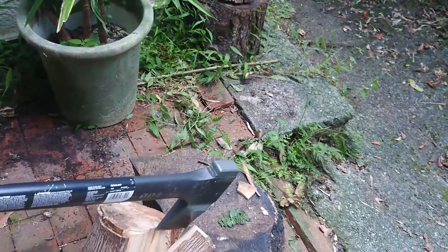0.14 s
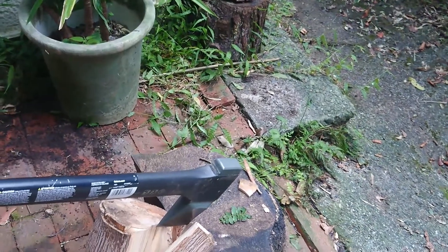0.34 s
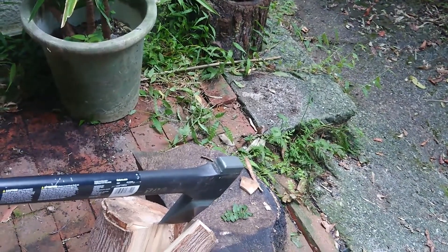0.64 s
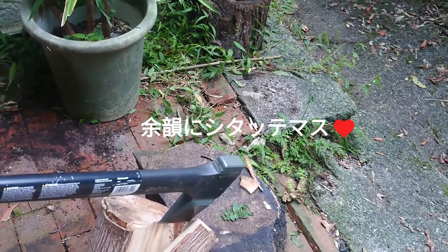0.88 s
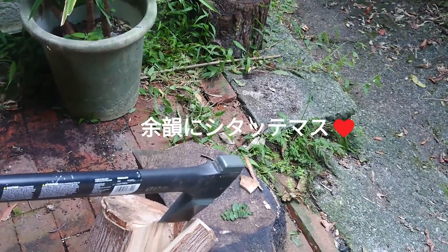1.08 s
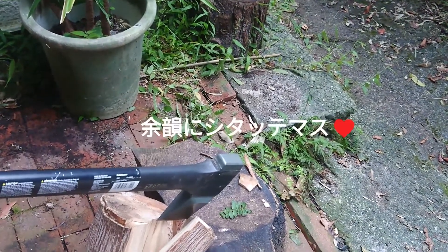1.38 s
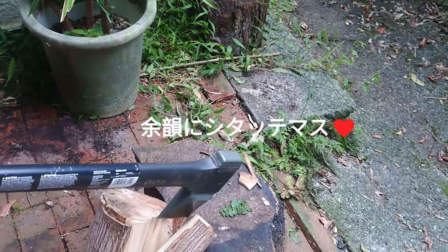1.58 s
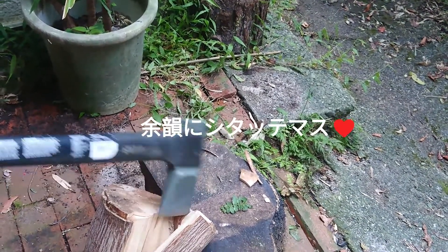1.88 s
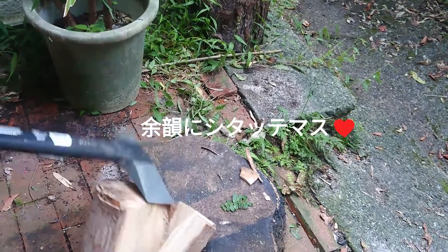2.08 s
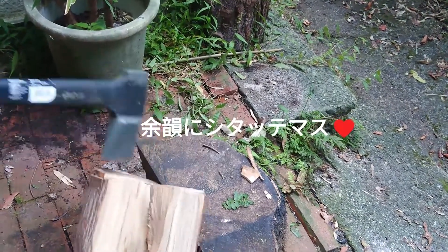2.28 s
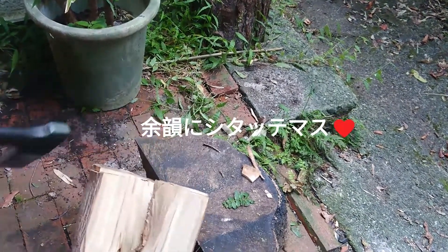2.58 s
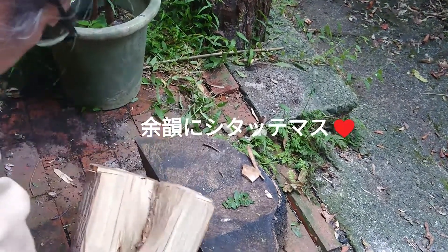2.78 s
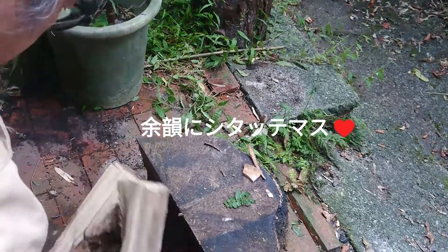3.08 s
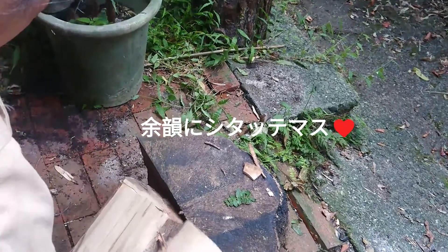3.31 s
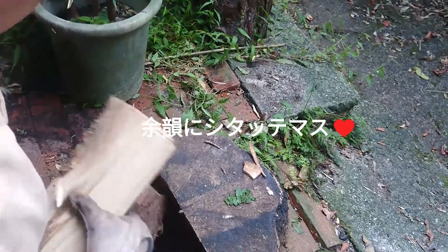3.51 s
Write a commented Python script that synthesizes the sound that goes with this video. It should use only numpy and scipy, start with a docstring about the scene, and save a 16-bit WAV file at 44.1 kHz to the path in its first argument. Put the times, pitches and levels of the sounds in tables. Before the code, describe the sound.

Wood knocks, creaks and splinters close by, ending with a loud clunk in a quiet yard.

```python
"""In a quiet yard an axe head is levered out of a split log; the wood scrapes, ticks, cracks and thuds.
Rubbed and snapping wood is coloured fibre clicks; cracks, knocks and thuds are half-sine pushes on modes.
Shaped noise makes distant traffic rumble under leaves and air. Gliding sine strokes make a high cricket,
throbbing narrow noise a low one, and short noise the swells of a far cicada and one small chirp.
A phone with two microphone ports listens from close by."""
import sys
import numpy as np
from scipy import signal
from scipy.fft import rfft, irfft, next_fast_len
from scipy.io import wavfile
from scipy.ndimage import uniform_filter1d

SR = 44100
rng = np.random.default_rng(int(sys.argv[2]) if len(sys.argv) > 2 else 0)


def invert_db(x):
    """Field ratio 10**(x/20) for x, a level in decibels (scalar or array-like)."""
    u = np.asarray(x, float) / 20
    return 10 ** u


def wrap_up_sound(samples):
    """Save the sound to the file named by the first command line argument, as 16-bit audio."""
    columns = np.atleast_2d(samples).T
    # keep every value between -1 and 1, then stretch to whole-number steps
    tamed = np.clip(columns, -1, 1)
    steps = np.round(tamed * 32767).astype(np.int16)
    wavfile.write(sys.argv[1], SR, steps)


N = 160965


def evened(x):
    """Scales to unit rms."""
    return x / np.sqrt(np.mean(x ** 2) + 1e-20)


def read(points, hz):
    """Reads a table on a log-frequency axis."""
    f, value = np.transpose(points)
    return np.interp(np.log(hz + 1), np.log(f + 1), value)


def add(mix, s, sound):
    """Mixes a sound in at time s."""
    part = mix[round(s * SR):][:len(sound)]
    part += sound[:len(part)]


def colour(x, gain):
    """Filters by a gain given as a function of Hz."""
    size = next_fast_len(len(x) + 4096)
    return irfft(rfft(x, size) * gain(np.fft.rfftfreq(size, 1 / SR)), size)[..., :len(x)]


def fuzzy(hz, width_hz, size):
    """Noise in one resonance, unrelated at the two ports."""
    bell = lambda f: 1 / (1 + (2 * (f - hz) / width_hz) ** 2)
    return np.array([evened(colour(rng.standard_normal(size), bell)) for _ in range(2)])


# tone of the neighbourhood: f/Hz, relative level/dB per Hz
AIR_TONE = [(15, -71), (25, 4.5), (65, -3.5), (118, 1.5), (238, -15.5), (410, -13), (496, -16), (726, -15),
            (1390, -21.5), (2270, -23.5), (4020, -35.5), (4860, -30.5), (5720, -44.5), (6380, -40.5),
            (7300, -50), (9330, -44.5), (12600, -57), (13600, -80)]
# likeness of the air at the two ports: f/Hz, likeness (1 = same, -1 = opposed)
AIR_LIKENESS = [(60, 0.8), (130, 0.98), (290, 0.71), (640, 0.5), (1410, -0.37), (3100, 0.071),
                (6820, -0.11), (15000, 0.15)]
# lean of the air to one side: f/Hz, left-right level/dB
AIR_LEAN = [(60, -1.5), (110, -2.5), (200, -0.5), (380, 2.5), (700, 0.0), (1290, -1.5), (2380, -7),
            (4400, -8), (8120, 7.5), (15000, -3)]
AIR_RMS_DB, AIR_PATCH_DB, AIR_SWELL_DB = -45.5, 1.2, 0.4


def air():
    """Rumble and hiss as noise in time and frequency, with drifting patches and a slow swell."""
    frames, hz = N // 256 + 5, np.fft.rfftfreq(1024, 1 / SR)
    a, b, c, d, patches = rng.standard_normal((frames, 513, 5)).T
    patches = evened(uniform_filter1d(uniform_filter1d(patches, 8, 0), 12, 1))
    swell = evened(uniform_filter1d(rng.standard_normal(frames), 60))
    same = np.clip(read(AIR_LIKENESS, hz), -1, 1)[:, None]
    left = a + 1j * b
    right = same * left + np.sqrt(1 - same ** 2) * (c + 1j * d)
    lean = read(AIR_LEAN, hz)[:, None] / 2
    level = read(AIR_TONE, hz)[:, None] + AIR_PATCH_DB * patches + AIR_SWELL_DB * swell
    spectrum = np.array([left, right]) * invert_db(level + np.array([lean, -lean]))
    return invert_db(AIR_RMS_DB) * evened(signal.istft(spectrum, nperseg=1024, noverlap=768)[1][:, :N])


# far cicada swells and one small, narrow chirp:
# start t/s, length t/s, level/dB at full swell before side balance, centre f/Hz, width f/Hz
CICADA_AND_CHIRP = [(.12, .33, -57.5, 4100, 430), (1.055, .09, -61, 3470, 80),
                    (1.07, .31, -57.5, 4120, 430), (1.43, .2, -69, 4500, 400), (3.28, .28, -60, 4200, 500)]
SWELL_SKEW = 0.9  # below 1 the swell tops early


def cicada_and_chirp():
    """Far cicada swells and one small, narrow chirp: narrow noise in single arcs."""
    out = np.zeros((2, N))
    for s, length, db, hz, width_hz in CICADA_AND_CHIRP:
        u = np.arange(0, length, 1 / SR) / length
        arc = invert_db(db) * np.sin(np.pi * u ** 0.9)
        for channel, note in zip(out, fuzzy(hz, width_hz, N)):
            add(channel, s, arc * note[:len(u)])
    return out


THROB_HZ, THROB_WIDTH_HZ, THROBS_PER_S = 4960, 230, 16
THROB_DB, THROB_SHARP = -73.5, 0.85  # level before side balance; higher is more peaked


def low_cricket():
    """A fuzzy note of narrow noise that throbs steadily."""
    t = np.arange(N) / SR
    throb = evened(np.exp(THROB_SHARP * np.cos(2 * np.pi * THROBS_PER_S * (t - 0.03))))
    return invert_db(THROB_DB) * fuzzy(THROB_HZ, THROB_WIDTH_HZ, N) * throb


# fader of the high cricket: t/s, level/dB before side balance
TRILL_LEVEL = [(.44, -98), (.5, -89), (.9, -82.5), (1.3, -80), (2, -75.5), (2.8, -76.5), (3.1, -75),
               (3.3, -85)]
# strokes of one chirp: middle f/Hz, relative level/dB
CHIRP_STROKES = [(6780, -3), (6500, 0), (6280, -2)]
CHIRP_START_S, CHIRPS_PER_S = 1.2035, 27.85  # the start only sets where the steady cycle falls
STROKE_S, STROKE_SPACING_S, STROKE_FALL_HZ = 0.011, 0.009, 450
WALL_ECHO_S, WALL_ECHO_DB = 0.016, -10


def high_cricket():
    """Each chirp is three falling sine strokes, echoed by a wall; the ports hear it in opposition."""
    t = np.arange(N) / SR
    since = ((t - CHIRP_START_S) * CHIRPS_PER_S % 1) / CHIRPS_PER_S
    chirps = np.zeros(N)
    for k, (hz, db) in enumerate(CHIRP_STROKES):
        u = np.clip((since - k * STROKE_SPACING_S) / STROKE_S, 0, 1)
        falling_hz = hz - STROKE_FALL_HZ * (u - 0.5)
        chirps += invert_db(db) * np.sin(np.pi * u) ** 2 * np.sin(2 * np.pi * np.cumsum(falling_hz) / SR)
    chirps = chirps + invert_db(WALL_ECHO_DB) * np.roll(chirps, round(WALL_ECHO_S * SR))
    chirps = evened(chirps) * invert_db(np.interp(t, *np.transpose(TRILL_LEVEL)))
    return np.array([chirps, -chirps * 2])


def insects():
    """Both crickets, the cicada and the small chirp, with one side balance for all."""
    balance_db = -5.5  # left-right
    both = high_cricket() + low_cricket() + cicada_and_chirp()
    return both * invert_db(np.array([[1], [-1]]) * balance_db / 2)


# decay of the reflections: f/Hz, t60 t/s
YARD_DECAY = [(150, 0.23), (600, 0.13), (2500, 0.16), (9000, 0.31)]
YARD_DB, YARD_MONO_HZ = -6.5, 500  # reflections grow alike at both ports below this


def yard(x):
    """Sparse reflections off bricks, pots and wall, each band dying at its own speed."""
    taps = rng.choice([-1., 1.], (2, SR // 2)) * (rng.random((2, SR // 2)) < 2000 / SR)
    taps[:, :150] = 0  # nothing returns in the first 3.4 ms
    hz, t, z = signal.stft(taps, SR, nperseg=256)
    decay = invert_db(-60 * t / read(YARD_DECAY, hz)[:, None])
    tail = signal.istft(z * decay, SR, nperseg=256)[1]
    unlike = colour(tail[0] - tail[1], lambda f: f ** 2 / (f ** 2 + YARD_MONO_HZ ** 2)) / 2
    tail = tail.mean(0) + np.array([unlike, -unlike])
    return invert_db(YARD_DB) * signal.fftconvolve(x[None], tail / np.linalg.norm(tail[0]), axes=1)[:, :N]


# lean of the near wood: f/Hz, left-right level/dB
NEAR_LEAN = [(60, -12), (110, 0.5), (200, -4), (380, 4), (700, -1.5), (1290, 0.5), (2380, -12.5),
             (4400, -10), (8120, 11.5), (15000, -2.5)]
NEAR_LEAD_S = 0.00015  # the left port hears it first


def ports(x):
    """A near source reaches the two ports with different colour and a small delay."""
    def path(side):
        return lambda f: (invert_db(side * read(NEAR_LEAN, f) / 2)
                          * np.exp(1j * np.pi * side * f * NEAR_LEAD_S))
    return np.array([colour(x, path(side)) for side in (1, -1)])


# colour of rubbed wood: f/Hz, relative level/dB per Hz
WOOD_GRAIN = [(250, 10), (600, 8.5), (1300, 8), (2100, 3.5), (2900, 5.1), (4000, 8), (5500, 5.5),
              (7000, -2.5), (8500, 0.5), (10500, -1), (12500, -12.5), (14200, -28), (16000, -17)]
FIBRES_PER_S, FIBRE_SPREAD_DB = 5500, 3.5
RING_DB, RING_WIDTH_HZ = 12, 500
LIFT_HZ = 5730  # half of the treble lift, in dB, is reached here


def rub(shape, judder_db, lift_db, hz):
    """Uneven fibre clicks under a pressure shape ring the wood at its colour and one resonance."""
    size = len(shape) + 1000  # room to ring on
    luck, when, sign, shake = rng.random((size, 4)).T
    strength = invert_db(FIBRE_SPREAD_DB * np.minimum(-np.log(luck + 1e-9), 4))
    clicks = strength * np.sign(sign - 0.5) * (when < FIBRES_PER_S / SR)
    clicks *= invert_db(judder_db * evened(uniform_filter1d(shake - 0.5, 150)))
    tone = lambda f: invert_db(read(WOOD_GRAIN, f)) * (1 + invert_db(RING_DB) / (1 + 2j * (f - hz) / RING_WIDTH_HZ))
    lift = lambda f: invert_db(lift_db / (1 + (LIFT_HZ / (f + 1)) ** 4))
    scale = np.std(colour(clicks, tone))
    pressed = clicks * np.pad(shape, (0, size - len(shape)))
    return colour(pressed, lambda f: tone(f) * lift(f)) / scale


# rough faces slide: start t/s, length t/s, level/dB at full pressure before lift, treble lift/dB, ring f/Hz
FACE_SCRAPES = [(1.729, 0.17, -57.5, -6, 2960), (1.983, 0.057, -47, -2.7, 3070),
                (2.05, 0.062, -45, 1.3, 2030), (2.152, 0.074, -41, 0, 3360), (2.155, 0.042, -46, -9, 1500),
                (2.207, 0.039, -48.5, 3, 2530), (2.24, 0.068, -49.5, 6.5, 2720),
                (2.283, 0.043, -40.5, -2, 2900), (2.588, 0.1, -56, 0, 2300), (2.769, 0.13, -46, 4, 2630),
                (2.911, 0.092, -50, -7.5, 1400), (3.01, 0.044, -48, 3, 2500),
                (3.056, 0.066, -41.5, -1, 2940), (3.154, 0.068, -56, 3.5, 3980),
                (3.248, 0.11, -52, -13, 1920), (3.39, 0.11, -52.5, -6, 2770),
                (3.463, 0.024, -53.5, 9, 2920), (3.56, 0.33, -61, -5, 2380)]
SCRAPE_SKEW, SCRAPE_JUDDER_DB = 0.47, 3.5  # skew below 1 tops early


def scrapes():
    """Rough faces slide over each other; the pressure swells and fades."""
    out = np.zeros(N)
    for s, length, db, lift_db, hz in FACE_SCRAPES:
        u = np.arange(0, length, 1 / SR) / length
        pressure = invert_db(db) * np.sin(np.pi * u ** SCRAPE_SKEW)
        add(out, s, rub(pressure, SCRAPE_JUDDER_DB, lift_db, hz))
    return out


# splinters snap: t/s, level/dB before halving and lift, t60 t/s, treble lift/dB, ring f/Hz
SPLINTER_TICKS = [(1.9857, -40, 0.022, -7, 3240), (2.1645, -32, 0.03, -6, 2900),
                  (2.179, -29, 0.034, -3, 3000), (2.2135, -35, 0.025, 0.1, 2430),
                  (2.2518, -29.5, 0.036, 8, 2800), (2.2848, -31.5, 0.032, -6, 2280),
                  (2.3016, -27, 0.019, -19, 2600), (2.3224, -48, 0.027, 5, 3100),
                  (2.403, -32.5, 0.032, -4, 1600), (2.498, -50, 0.029, 8, 2480),
                  (2.7776, -39, 0.031, -22, 2400), (2.8005, -32.5, 0.031, 4, 2520),
                  (2.8135, -31, 0.033, 0.1, 1500), (2.82, -27.5, 0.058, -1, 3010),
                  (2.8325, -27, 0.042, 1, 2520), (2.8704, -40, 0.028, -5, 1730),
                  (2.9525, -35, 0.043, -7, 1560), (3.013, -29, 0.024, 7.5, 3000),
                  (3.0574, -29.5, 0.04, 1, 3900), (3.0644, -23.5, 0.034, 2, 3520),
                  (3.092, -29, 0.03, -15, 3730), (3.2118, -31.5, 0.063, -8, 1660),
                  (3.257, -24, 0.038, -2.3, 8220), (3.264, -17, 0.025, -10, 2740),
                  (3.421, -37, 0.022, -2, 5800), (3.4272, -30, 0.043, -7, 2800),
                  (3.4675, -32.5, .02, 2, 6050), (3.47, -32, 0.023, 5.5, 2963),
                  (3.5645, -43.5, 0.07, -4, 2620)]
TICK_RISE_S, TICK_JUDDER_DB = 0.00042, 3


def ticks():
    """Splinters snap: fibre clicks that start at once and die away."""
    out = np.zeros(N)
    t = np.arange(SR // 10) / SR
    for s, db, t60, lift_db, hz in SPLINTER_TICKS:
        snap = np.minimum(t / TICK_RISE_S, 1) * invert_db(db - 60 * t / t60) / 2
        add(out, s - TICK_RISE_S, rub(snap, TICK_JUDDER_DB, lift_db, hz))
    return out


def fibres():
    """Scraping and snapping fibres together, drawn afresh at each call."""
    return scrapes() + ticks()


def blow(modes, peak_db, contact_ms, share):
    """A half-sine push sets the modes ringing, neighbours in opposite phase."""
    t = np.arange(SR // 4) / SR
    ring = np.zeros(len(t))
    for k, (hz, db, t60) in enumerate(modes):
        ring += (-1) ** k * invert_db(db - 60 * t / t60) * np.sin(2 * np.pi * hz * share * t)
    u = np.arange(SR // 100) / SR / (contact_ms / 1000)
    push = np.sin(np.pi * np.minimum(u, 1))
    sound = signal.fftconvolve(ring, push)
    return invert_db(peak_db) * sound / abs(sound).max()


def blows(modes, hits):
    """Lays a row of pushes on one set of modes along the timeline."""
    out = np.zeros(N)
    for s, peak_db, contact_ms, share in hits:
        add(out, s, blow(modes, peak_db, contact_ms, share))
    return out


# splinters crack sharply: t/s, peak level/dB, push t/ms, pitch share
CRACK_HITS = [(2.166, -29, 0.24, 0.94), (2.183, -26, 0.17, 0.99), (2.2535, -32, 0.12, 1.05),
              (2.291, -28.5, 0.12, 1.06), (3.0143, -22, 0.098, .99), (3.057, -29, 0.13, 1.14),
              (3.063, -19, 0.11, 0.92), (3.2575, -30, 0.23, .72), (3.4285, -34, .12, 0.79),
              (3.4705, -32.5, 0.082, 0.96)]
# modes of a splinter: f/Hz before pitch share, relative level/dB, t60 t/s
SPLINTER_MODES = [(2340, -3, 0.017), (2900, 2.5, .02), (3540, 2, 0.015), (4470, -3, 0.016),
                  (5840, -3, 0.0091), (7900, -10, .012)]


def cracks():
    """Splinters crack sharply: very short pushes ring small, high modes."""
    return blows(SPLINTER_MODES, CRACK_HITS)


# hard edges knock on wood: t/s, peak level/dB, contact t/ms, pitch share
KNOCK_HITS = [(2.058, -30, 0.88, 0.92), (2.07, -13, 0.23, 0.92), (2.0718, -15, 0.2, 0.93),
              (2.0742, -16, 0.21, 1.07), (2.084, -29.5, 0.96, 1.8), (2.1555, -31.5, 0.23, 1.01),
              (2.8164, -27, 0.43, 1.02), (3.2638, -16.5, 0.98, 0.83)]
# modes of the wedged wood: f/Hz before pitch share, relative level/dB, t60 t/s
WEDGED_MODES = [(195, 0, 0.039), (355.4, -6, 0.063), (463, 0, 0.022), (645, -3.5, 0.01), (788, -5.5, 0.027),
                (1077, -4, 0.043), (1250, -6, 0.011), (1500, 3.5, 0.035), (1800, 2.5, 0.024),
                (2000, -0.5, 0.019), (2520, 0, 0.014), (2900, 6, 0.011), (3475, 3.5, 0.014)]


def knocks():
    """Hard edges knock on wood: short contacts ring the wedged modes."""
    return blows(WEDGED_MODES, KNOCK_HITS)


# low wooden thuds and soft bumps, some made of overlapping pushes: t/s, peak level/dB, push t/ms, pitch share
THUD_PUSHES = [(2.352, -35, 3.2, 1.02), (2.682, -34, 2.5, 1.48), (2.778, -29, 0.32, 1.33),
               (2.812, -17, 1.3, 0.796), (2.821, -30, 2, 1.06), (2.832, -26.5, 1.05, 0.74),
               (2.843, -22, 4.6, 0.904), (3.2586, -6.5, 1.18, 1.281), (3.2603, -7.5, 1.6, 1.04),
               (3.274, -18.5, 1.2, 1.03)]
# modes of the log: f/Hz before pitch share, relative level/dB, t60 t/s
LOG_MODES = [(108.4, -8, 0.069), (171, -2, 0.059), (271.6, -0.5, 0.032), (341.5, 0.5, 0.05),
             (420, -2.5, 0.041), (485, -6.5, 0.023), (606, -8, 0.026), (770, -12, 0.08), (890, -4, 0.049),
             (1076, -5.5, 0.048), (1190, -11, 0.037), (1415, -1.5, 0.047)]


def thuds():
    """Low wooden thuds and soft bumps, some made of overlapping pushes on the low modes."""
    return blows(LOG_MODES, THUD_PUSHES)


def wood():
    """All that the wood does, dry."""
    return fibres() + cracks() + knocks() + thuds()


def scene():
    """Wood near the phone, its reflections, insects and air."""
    near = wood()
    # further fibres, 6 dB down, that the ports hear in opposition
    extent = invert_db(-6) * ports(fibres()) * [[1], [-1]]
    return air() + insects() + yard(near) + extent + ports(near)


def top_cut(x):
    """Nothing passes above the cut-off."""
    return signal.sosfilt(signal.butter(12, 16780, fs=SR, output="sos"), x)


def record(dry):
    """The microphone drops the lowest bass, below 52 Hz."""
    low_cut = signal.butter(4, 52, "high", fs=SR, output="sos")
    mix = signal.sosfilt(low_cut, dry)
    return top_cut(mix)


dry = scene()
out = record(dry)
wrap_up_sound(out)
```